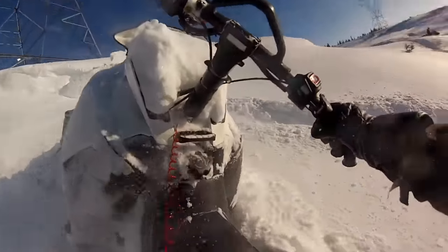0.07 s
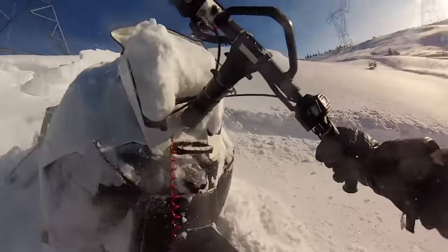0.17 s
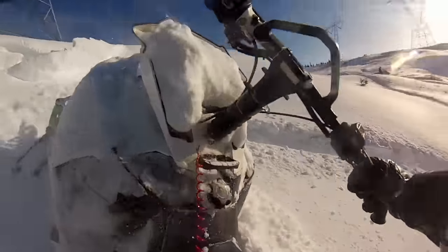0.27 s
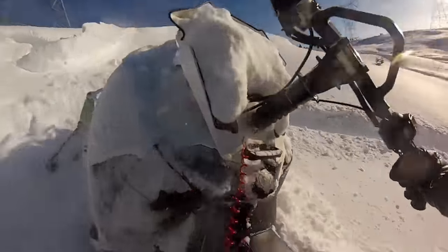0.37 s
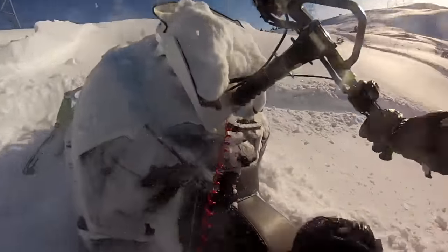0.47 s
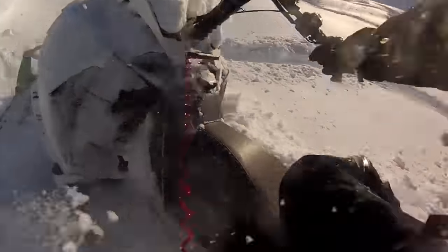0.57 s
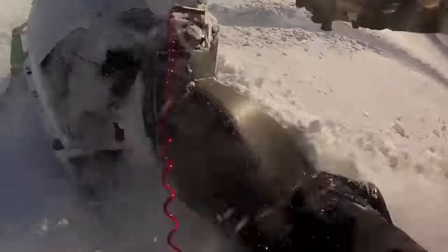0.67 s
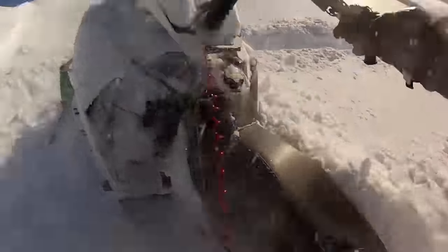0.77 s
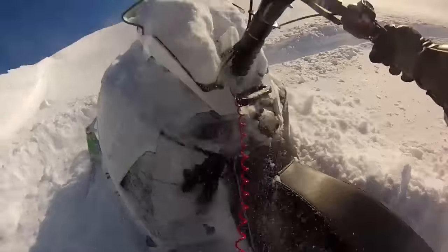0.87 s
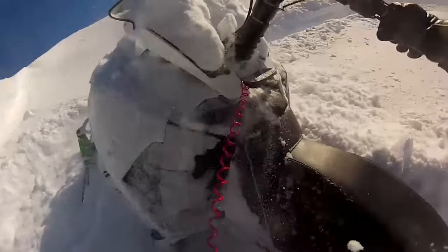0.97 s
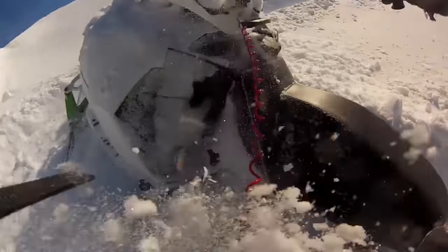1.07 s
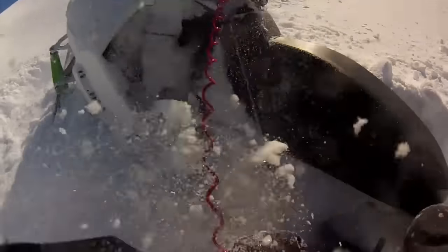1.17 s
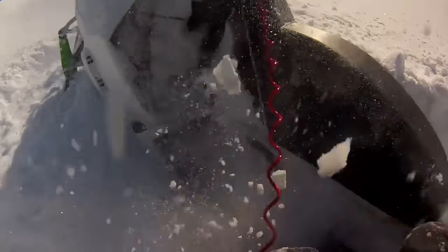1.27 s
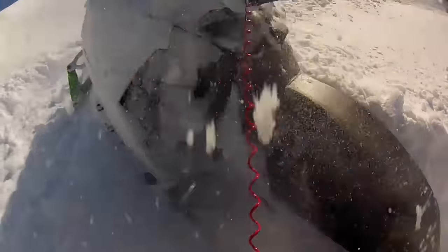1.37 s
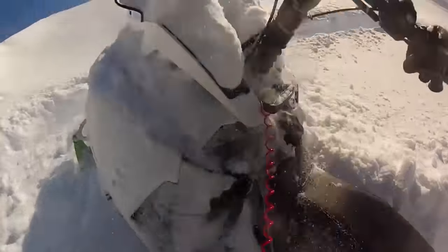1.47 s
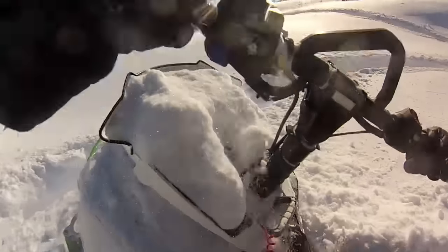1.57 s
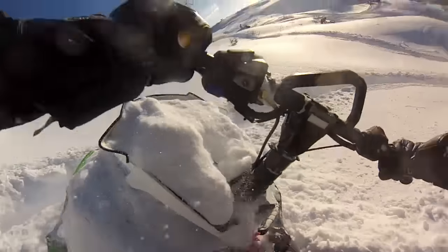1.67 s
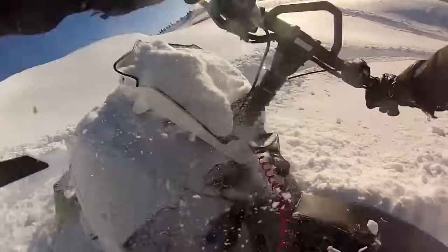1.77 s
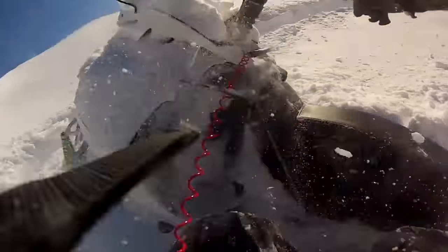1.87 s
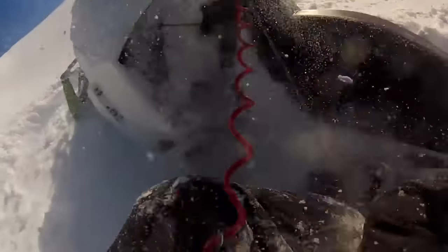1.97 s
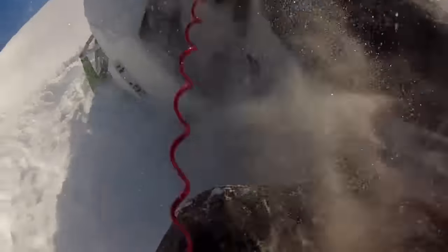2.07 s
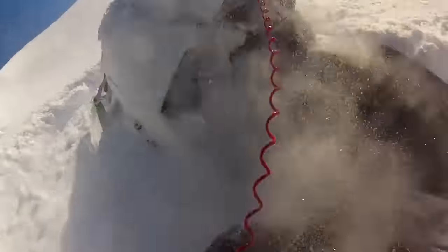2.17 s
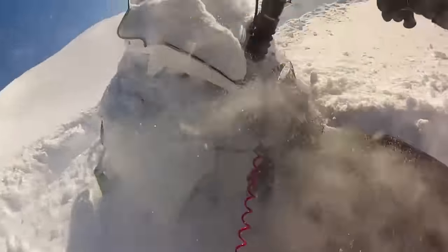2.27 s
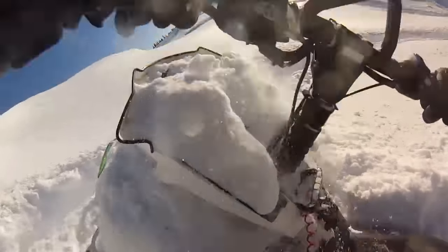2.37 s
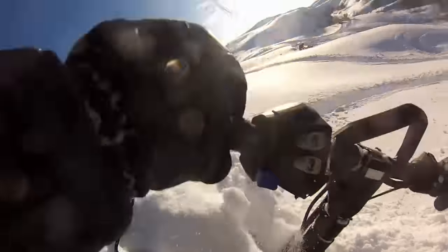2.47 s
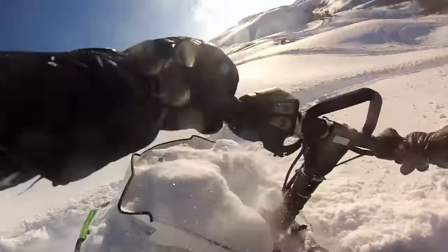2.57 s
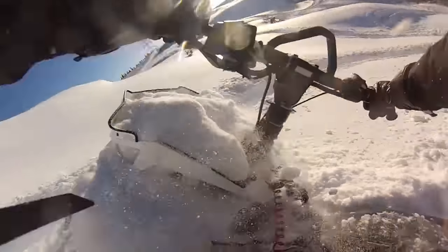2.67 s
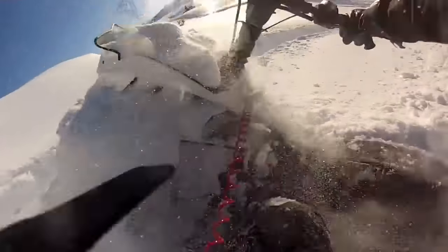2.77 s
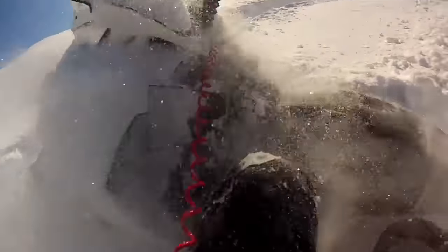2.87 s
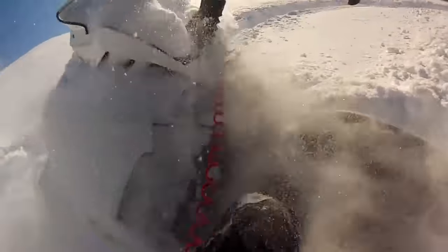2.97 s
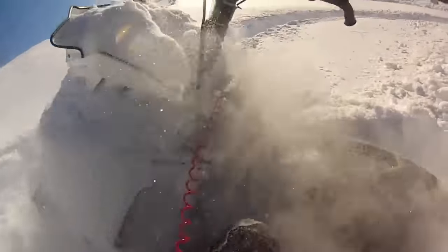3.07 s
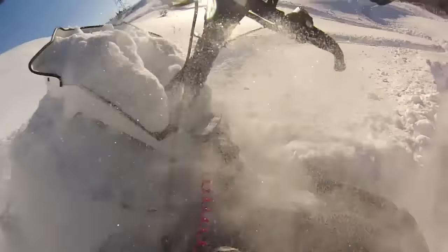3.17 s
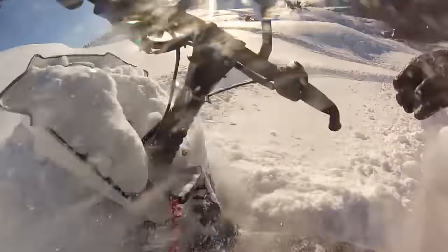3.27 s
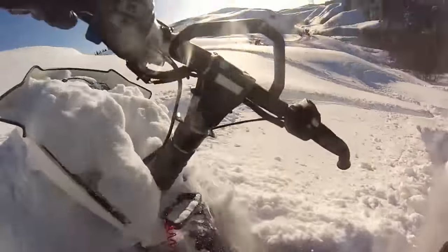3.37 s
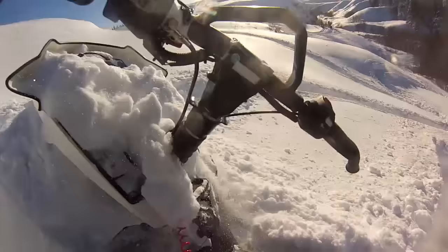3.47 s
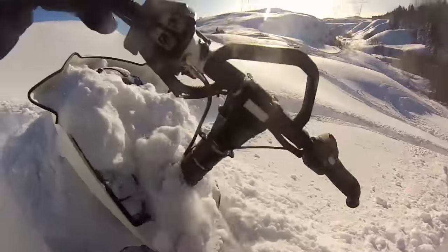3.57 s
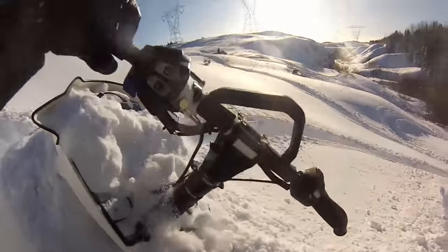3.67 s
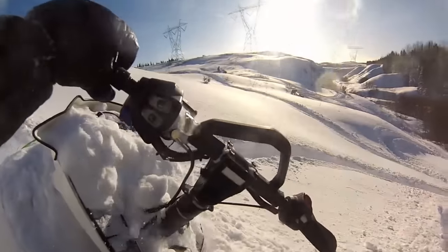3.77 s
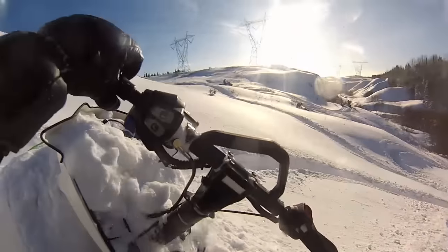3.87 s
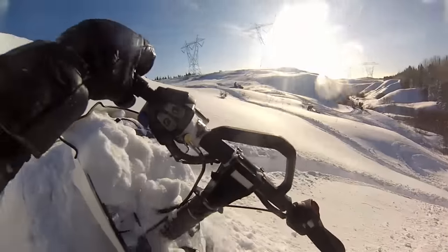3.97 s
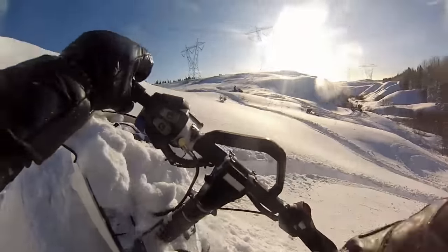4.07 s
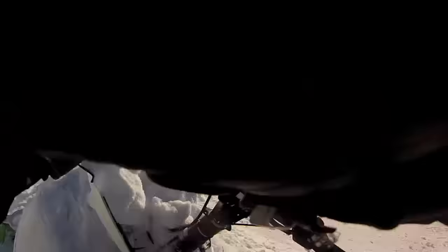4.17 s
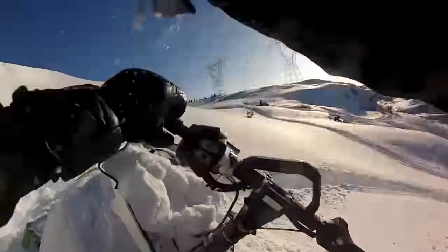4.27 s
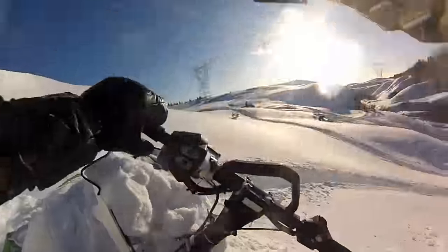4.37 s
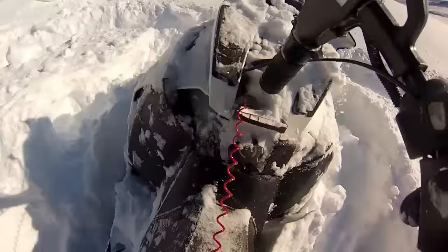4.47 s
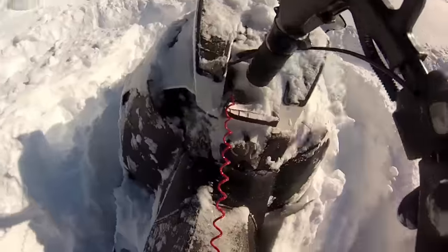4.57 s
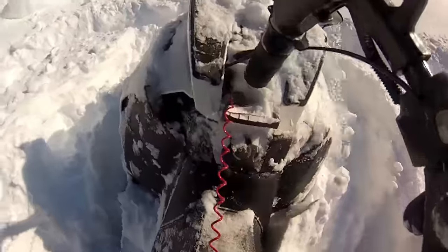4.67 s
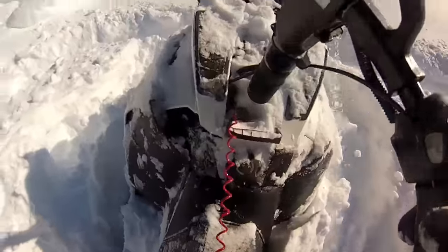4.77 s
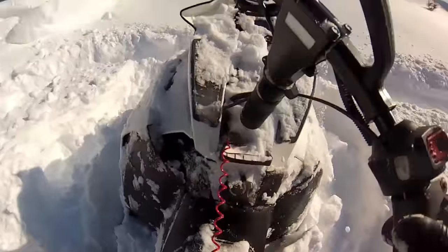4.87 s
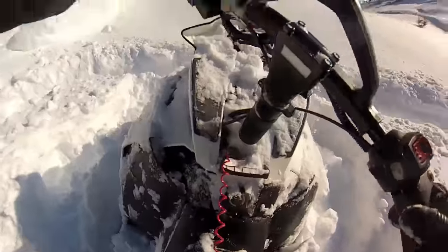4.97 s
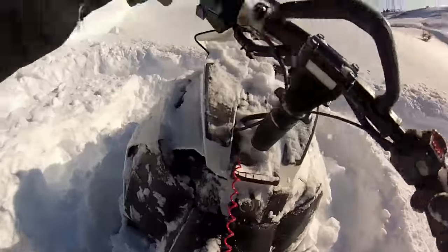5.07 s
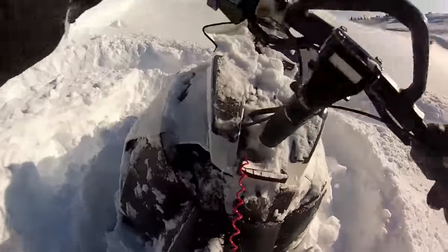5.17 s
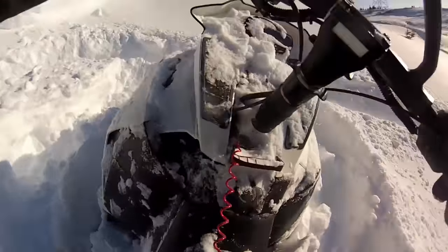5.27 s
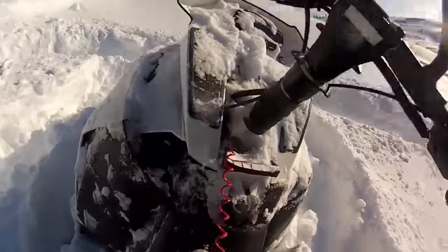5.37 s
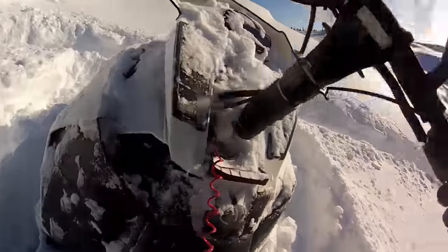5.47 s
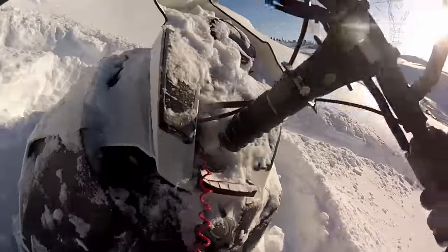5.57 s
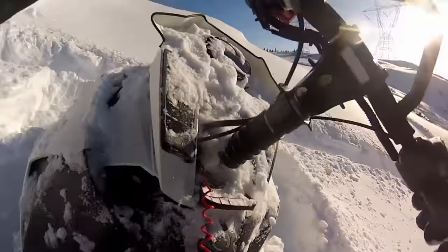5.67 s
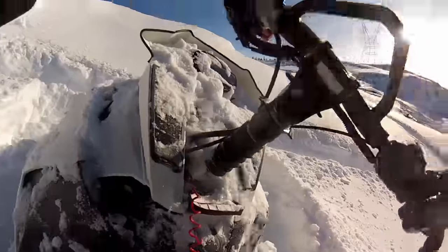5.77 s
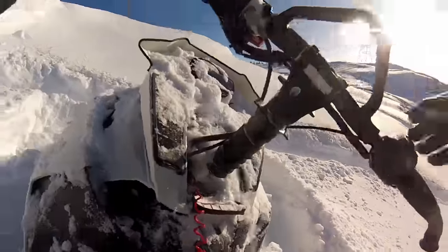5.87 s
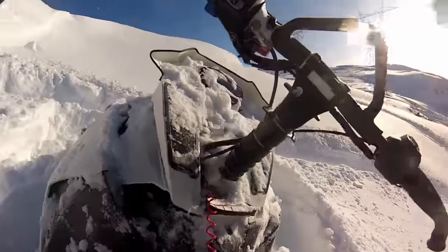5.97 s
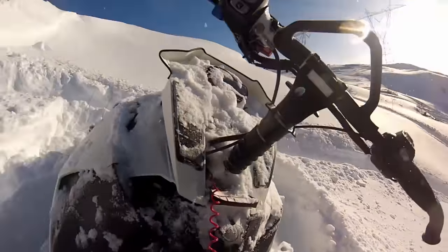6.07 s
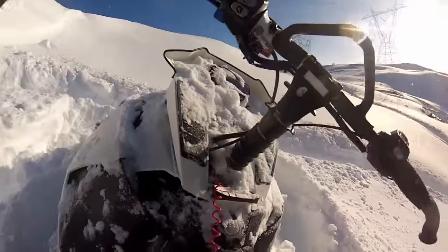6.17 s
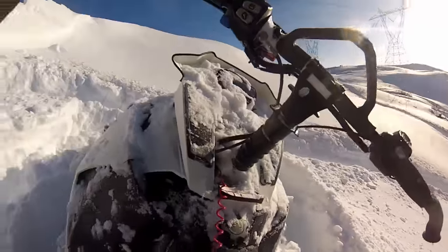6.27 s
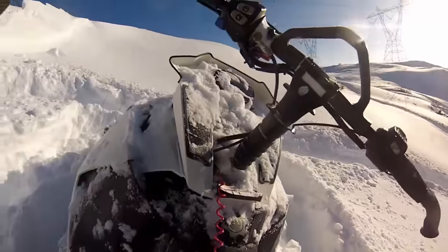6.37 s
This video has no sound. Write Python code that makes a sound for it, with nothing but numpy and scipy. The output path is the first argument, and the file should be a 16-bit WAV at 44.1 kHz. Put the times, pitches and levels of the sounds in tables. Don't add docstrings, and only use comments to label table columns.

```python
import sys
import numpy as np
from scipy import signal
from scipy.io import wavfile

SR = 44100
rng = np.random.default_rng(int(sys.argv[2]) if len(sys.argv) > 2 else 0)


def boost(x):
    u = np.asarray(x, float) / 20
    return 10 ** u


def put_to_file(sound):
    columns = np.atleast_2d(sound).T
    safe = np.clip(columns, -1, 1)
    whole_steps = np.round(safe * 32767)
    wavfile.write(sys.argv[1], SR, whole_steps.astype(np.int16))


N = 284004
T = np.arange(N) / SR
FULL_LOAD_DB = -23
SHUT_S, HEAD_DOWN_S = 2.9, 4.5

# f/Hz, level/dB per Hz
LOADED_COLOUR = [(170, -10.5), (300, -12), (760, -21), (1180, -20), (1400, 0.5), (1830, -3.5), (2500, -12),
                 (3050, -18), (3600, -10), (4600, -23), (5400, -27), (11000, -36.5), (13000, -42.5),
                 (16000, -47)]


def rms_one(x):
    return x / np.sqrt(np.mean(x ** 2) + 1e-20)


def in_time(rows):
    s, *columns = np.transpose(rows)
    return [np.interp(T, s, c) for c in columns]


def at_hz(points, hz):
    table_hz, level_db = np.transpose(points)
    return np.interp(np.log(hz), np.log(table_hz), level_db)


def bumps(rows):
    coarse = T[::64]
    total_db = np.zeros(len(coarse))
    for s, db, width in rows:
        total_db += db * np.exp(-((coarse - s) / width) ** 2)
    return np.interp(T, coarse, total_db)


def drift(rate):
    r = np.exp(-80 * np.pi * rate / SR)
    noise = rng.standard_normal(N // 40 + 2002)
    slow = signal.lfilter([1], [1, -2 * r, r * r], noise)[2000:]
    return np.interp(np.arange(N) / 40, np.arange(len(slow)), rms_one(slow))


def band(x, low_hz, high_hz):
    return signal.sosfilt(signal.butter(2, [low_hz, high_hz], "band", fs=SR, output="sos"), x)


def ring(x, hz, t60):
    r, w = boost(-60 / (t60 * SR)), 2 * np.pi * hz / SR
    return signal.lfilter([0, np.sin(w)], [1, -2 * r * np.cos(w), r * r], x)


def sine(turns):
    return np.sqrt(2) * np.sin(2 * np.pi * (turns + rng.random()))


def crank():
    # t/s, speed/turns per s
    revs = [(0.0, 127.5), (0.28, 127.8), (0.8, 126.8), (1.11, 128.5), (1.26, 126.3), (1.47, 124.5),
            (1.72, 126.8), (1.92, 127.2), (2.18, 124.3), (2.47, 127.1), (2.88, 126.6), (3.0, 121.0),
            (3.1, 102.5), (3.25, 88.3)]
    # t/s, rate/firings per s
    idle_firings = [(4.45, 50.5), (4.8, 46.5), (5.3, 50.8), (6.44, 52.5)]
    return in_time([*revs, *[(s, rate / 2) for s, rate in idle_firings]])[0]


def exhaust(speed, turns, load_db):
    # t/s, level/dB, width/s
    smothered = [(.05, -1, .2), (.95, -2, .12), (1.5, -10.5, 0.087), (1.68, -4.5, 0.076),
                 (2.25, -6.5, 0.12), (2.57, -5.5, 0.075), (2.75, -2.5, .08)]
    order_levels = [-18, -15.5, -21, -25, -42, -26, -26.5, -26, -9.5, -10, -8.5, -12.5, -15, -14, -13, -15,
                    -13.5, -15.5, -20, -21, -18, -22]
    # order, t/s, level/dB, width/s
    sings = [(6, .7, 9, .95), (8, .6, 8, .35), (10, 1.3, 7, .1), (10, 1.8, 15, .15), (11, .2, 3.5, .1),
             (11, 1.13, -14, 0.13), (11, 2.08, -16, 0.14), (12, 1.05, 3, .06), (12, 1.74, 6, 0.11),
             (12, 2.72, 7, 0.073), (13, 0.35, 6, 0.14), (13, 0.96, 8, 0.063), (13, 1.32, 8, .1),
             (13, 2.07, 8, .07), (12, 2.08, 5, .08), (14, 0.29, 12.5, .28), (14, 0.924, 12, 0.094),
             (14, 2.95, 9, .06), (17, 0.32, 7.5, .2), (17, 1.84, 12, .06), (17, 2.35, 11.5, 0.078),
             (17, 2.75, 9, .08), (18, 2.17, 7.5, .1), (19, 2.05, 13, 0.067), (20, 2.45, 9, .07),
             (21, 2.42, 7, .06), (23, 2.35, 10, 0.076), (27, 2.5, 5, 0.32), (28, 2.85, 7, .1)]
    # multiple of crank, level/dB
    idle_orders = [(1, -35.5), (2, -62), (4, -45), (6, -52.5)]
    out = np.zeros(N)
    on = slice(round(3.6 * SR))
    shut = np.maximum(T - SHUT_S, 0)

    firing_db = -22 + 0.3 * (load_db - FULL_LOAD_DB) + bumps(smothered) - 300 * shut ** 2
    out[on] = boost(firing_db[on]) * sine(2 * turns[on])

    upper_db = load_db - 2.3 - 22 * shut
    uneven = (turns + 0.0041 * drift(3.0))[on]
    comb_db = [-25.5] * 8
    for k, order_db in enumerate([*order_levels, *comb_db], start=3):
        sing_db = bumps([row[1:] for row in sings if round(row[0]) == k])
        flutter_db = 1.3 * drift(5.6) + 2.1 * drift(25.0)
        level_db = (upper_db + order_db + sing_db + flutter_db)[on]
        level_db += at_hz(LOADED_COLOUR, k * speed[on]) - at_hz(LOADED_COLOUR, k * 127)
        out[on] += boost(level_db) * sine(k * uneven)

    idle_fade = np.clip((T - 4.3) / 0.17, 0, 1)
    for k, level_db in idle_orders:
        out += idle_fade * boost(level_db + 2.8 * drift(4.1)) * sine(k * turns)
    return out


def firing_gate(turns, idle):
    firing = 2 * turns
    index = firing.astype(int)
    chance_db = (-1.0 + 2.5 * idle) * rng.standard_normal(4000)[index]
    strength = boost(chance_db + 3.3 * (-1) ** index)
    puff = np.sin(np.pi * (firing % 1)) ** 2
    depth = np.clip(0.091 + 0.18 * idle, 0, 1)
    return rms_one(1 - depth + 2 * depth * puff * strength)


def rasp(idle, load_db, turn_db):
    # low/Hz, high/Hz
    zones = [(170, 1200), (1200, 2000), (2000, 4500), (4500, 16000)]
    # level/dB re load, share of load swing, share of head turn
    zone_rules = [(-9, .8, .3), (-4.8, .91, .9), (-6.3, .99, -.9), (-15.5, 1.05, -0.58)]
    # f/Hz, level/dB per Hz
    idling_colour = [(170, -15), (350, -22.5), (700, -12.5), (1030, -8.5), (1230, -12), (1500, 4),
                     (2200, -14.5), (2700, -15.5), (3150, -22.5), (3670, -24), (4500, -31), (5250, -36),
                     (11100, -38.5), (15500, -47)]
    out = np.zeros(N)
    white = rng.standard_normal((2, N))
    shared = drift(7.4)
    count = 0
    for (low, high), (zone_db, follows, turns_with) in zip(zones, zone_rules):
        level_db = FULL_LOAD_DB + zone_db + follows * (load_db - FULL_LOAD_DB) + turns_with * turn_db
        edges = np.geomspace(low, high, int(5 * np.log2(high / low)) + 1)
        centre, width = np.sqrt(edges[1:] * edges[:-1]), np.diff(edges)
        share = np.sqrt(width / len(width))
        loaded = rms_one(boost(at_hz(LOADED_COLOUR, centre)) * share)
        idling = rms_one(boost(at_hz(idling_colour, centre)) * share)
        for k in range(len(centre)):
            gain = (loaded[k] * (1 - idle) + idling[k] * idle) / np.sqrt(len(width))
            patch = boost(level_db + 0.97 * shared + 1.65 * drift(3.06))
            noise = white[count % 2]
            out += gain * patch * rms_one(band(noise, edges[k], edges[k + 1]))
            count += 1
    port = sum(ring(out, hz, 0.0027) for hz in (3500, 7880, 12000, 13400))
    return out + boost(-35.5) * port


def panels(gate, turns):
    # t/s, level/dB, width/s
    seam_buzz = [
        (.6, 32.2, 0.44),
        (1.25, 36, 0.25),
        (2.08, 39.3, 0.24),
        (2.95, 31.8, 0.3),
    ]
    # t/s, level/dB, width/s
    cover_whirr = [
        (2.95, 22, 0.25),
        (3.35, 21, .7),
    ]
    seam_noise = rms_one(ring(gate * rng.standard_normal(N), 5180, 0.0046))
    seam = boost(-72.5 + bumps(seam_buzz)) * seam_noise
    cover_noise = rms_one(ring(gate * rng.standard_normal(N), 3730, 0.005))
    cover = boost(-70 + bumps(cover_whirr)) * cover_noise

    firing = 2 * turns
    strength = boost(1.3 * rng.standard_normal(4000)[firing.astype(int)])
    bang = np.exp(-(firing % 1) / 0.3) * strength
    shake = (bang + 0.27) * rng.standard_normal(N)
    shake += 16 * strength * (np.diff(firing // 1, prepend=0) > 0)
    swell = ring(ring(shake, 1422, 0.014), 1506, 0.032)
    rings = rms_one(swell)
    rings += boost(-15.5) * rms_one(ring(shake, 3600, 0.0098))
    rings += boost(-27) * rms_one(ring(shake, 2460, 0.012))
    rise = np.clip((T - HEAD_DOWN_S) / 0.04, 0, 1)
    return seam + cover + boost(-42.5 + bumps([(4.56, 4.0, 0.06)])) * rise * rings


def track():
    # t/s, rate/lugs per s
    lugs = [(0, 105), (.98, 118), (1.12, 135), (1.55, 127), (2.02, 147), (2.32, 135), (2.8, 156),
            (2.95, 153), (3.1, 140)]
    # multiple of lug rate, level/dB
    lug_orders = [(1, -2), (2, -2), (3, -5)]
    # t/s, level/dB, width/s
    bites = [
        (.55, 29, 0.51),
        (1.3, 27, 0.19),
        (2.05, 23, 0.36),
        (2.75, 20, 0.39),
    ]
    turns = np.cumsum(in_time(lugs)[0]) / SR
    stop_db = 60 * np.maximum(T - SHUT_S, 0)
    tones = sum(boost(db + 1.8 * drift(1.87)) * sine(k * turns) for k, db in lug_orders)
    return boost(-59.5 + bumps(bites) - stop_db) * tones


def clods():
    # t/s, peak/dB, f/Hz, shell ring/dB above the thud, t60/s
    thuds = [(.445, -18, 540, -12, .014), (.49, -13, 577, -16, 0.018), (.592, -16.5, 566, -10, .015),
             (.913, -20.5, 686, -12, 0.022), (.99, -28, 700, -5, .013), (1.115, -22.5, 460, -17, 0.013),
             (1.301, -26, 420, -6, .014), (1.944, -10.5, 540, -28, 0.017), (1.957, -12, 420, -2, 0.018),
             (1.9693, -17, 940, 5.5, 0.011), (2.0053, -18.5, 974, 6.5, 0.025), (2.111, -16, 418, -4, 0.015),
             (3.387, -19.5, 564, -1, 0.0082), (3.728, -34.5, 700, 10, .01), (4.12, -31.5, 422, -6, .014),
             (4.28, -36, 900, -5, 0.0091), (6.328, -29, 317, -9.5, 0.018), (6.429, -41.5, 500, -1, .014)]
    # t/s, peak/dB, f/Hz, t60/s
    thumps = [(0.645, -38.5, 218, 0.064), (1.112, -7.5, 215, 0.079), (1.789, -21, 72.7, 0.05),
              (1.943, -10, 88.8, 0.055), (1.953, -14, 185, .07), (2.623, -14, 103, 0.055),
              (2.747, -14, 108, 0.057), (3.404, -15, 148, 0.035), (5.404, -20.5, 101.7, 0.079),
              (6.057, -20, 102, 0.061)]
    # t/s, peak/dB, f/Hz
    ticks = [(1.9459, 7.5, 3700), (1.944, -20, 11000), (1.959, -5, 3700), (1.959, -16, 8000),
             (1.978, -24, 5000), (3.08, -41, 13500), (3.1293, -24, 12000), (3.312, -38, 12500),
             (3.32, -36, 11500), (3.329, -37, 12000), (3.338, -39, 11000), (3.7284, -40, 4000),
             (4.1091, -46, 5000), (4.6329, -48.5, 6500), (4.6982, -41, 7000), (5.4106, -42, 6000),
             (6.3275, -42, 7000), (6.3535, -40, 6900)]
    out = np.zeros(N)
    soft = np.pad(np.hanning(12) / 6, (0, 3988))
    for s, peak_db, hz, shell_db, t60 in thuds:
        i = round(s * SR)
        thud = ring(soft, hz, t60) + boost(shell_db) * ring(soft, 1560, 0.013)
        out[i:i + 4000] += boost(peak_db + 5.0) * thud[:N - i]
    for s, peak_db, hz, t60 in thumps:
        i = round(s * SR)
        out[i:i + 4000] -= boost(peak_db) * ring(soft, hz, t60)
    for s, peak_db, hz in ticks:
        i = round(s * SR)
        crack = rng.standard_normal(400) * np.exp(-np.arange(400) / SR / 0.0018)
        crack[0] -= 4
        out[i:i + 400] += boost(peak_db) / 2 * band(crack, 0.8 * hz, min(1.25 * hz, 15500))
    return out


def glove():
    # t/s, height, rise/s, fall/s
    pushes = [
        (1.9465, -.45, .0015, .002),
        (4.1985, -2.6, .0013, .0019),
        (4.213, .5, .003, .003),
    ]
    # t/s, length/s, level/dB
    scuffs = [
        (4.195, 0.004, -27),
        (4.1999, .0025, -6),
        (4.2015, 0.0063, -24),
        (4.208, 0.012, -19),
        (4.215, 0.003, -29),
    ]
    push, scuff = np.zeros(N), np.zeros(N)
    for s, height, rise, fall in pushes:
        before = np.exp(-((T - s) / rise) ** 2)
        after = np.exp(-np.abs(T - s) / fall)
        push += height * np.where(T < s, before, after)
    for s, length, level_db in scuffs:
        touching = (T > s) * (T < s + length)
        scuff += boost(level_db) * touching * np.exp(-np.abs(T - s) / (0.65 * length))
    swing = np.zeros(N)
    swing[round(4.2 * SR)] = 0.26
    noise = rng.standard_normal(N)
    shell = band(noise, 1100, 11200) + 1.4 * band(noise, 3100, 4500)
    lid = boost(-61) * ring(noise * (np.abs(T - 4.226) < 0.008) + 1e-18, 2090, 0.031)
    return push + ring(swing + 1e-18, 15.6, 0.4) + scuff * shell + lid


def rumble(load_db):
    # t/s, level/dB, width/s
    jolts = [(.13, 10, .06), (.4, 5.5, .07), (.62, 4, .04), (.75, -10, .07), (.96, 10, 0.055),
             (1.23, 12.5, .05), (1.58, 7, 0.095), (1.71, -5, .04), (1.8, 9.5, 0.025), (1.98, 10.5, 0.048),
             (2.23, 14, 0.053), (2.7, 1.5, .1), (2.91, 6.5, .05), (3.17, -4.5, 0.14), (3.38, 2.5, 0.04),
             (3.88, -4, .12), (4.43, -13.5, .1), (4.68, 8, 0.043), (5.0, 5.5, 0.04), (5.18, -20, .08),
             (6.09, 5, 0.033), (6.35, -2, .08)]
    # t/s, level/dB, width/s
    drumming = [(.02, 5, .05), (.65, -3.5, .12), (1.3, 2, .15), (1.95, 8.5, 0.044), (2.7, -2, .12),
                (3.15, -6, .1), (3.85, -4, .15), (4.95, -3, .2), (5.95, 4, .1)]
    shake_db = 0.2 * (load_db - FULL_LOAD_DB)
    jolt_db = bumps(jolts)
    deep_db = -24.5 + shake_db + jolt_db
    drum_db = -31.5 + shake_db + 0.27 * jolt_db + bumps(drumming) + 2.0 * drift(3.6)
    deep = rms_one(band(rng.standard_normal(N), 14.7, 40.4))
    drum = rms_one(band(rng.standard_normal(N), 55, 149.6) * boost(3.5 * drift(33.0)))
    return boost(deep_db) * deep + boost(drum_db - 1.5) * drum


def scene():
    # t/s, level/dB, turn/dB
    load = [(0, -26, 0), (.4, -24.5, 0), (.7, -25, .5), (.95, -25, 0), (1.22, -23, 2.5), (1.42, -25.5, -.5),
            (1.55, -23.5, -0.5), (1.75, -26.5, -1), (2.05, -23.5, 0), (2.3, -25, -2), (2.58, -27.5, 0),
            (2.8, -24, 0), (2.97, -25.5, 0.5), (3.24, -33.5, 2), (4.0, -45, 0.5)]
    # t/s, level/dB, turn/dB
    load_idling = [
        (4.5, -45, 0.5),
        (4.62, -51, 0),
        (6.44, -51.5, 0),
    ]
    # t/s, level/dB
    duck = [
        (4.215, -0.5),
        (4.225, -25),
        (4.27, -10),
        (4.33, -7.5),
        (4.35, 2.5),
        (4.45, 1),
    ]
    speed = crank()
    turns = np.cumsum(speed) / SR
    load_db, turn_db = in_time([*load, *load_idling])
    gate = firing_gate(turns, idle=np.clip((T - 3.4) / 1.5, 0, 1))
    head_down = np.clip((T - HEAD_DOWN_S) / 0.068, 0, 1)
    engine = exhaust(speed, turns, load_db)
    engine += gate * rasp(head_down, load_db, turn_db)
    engine += panels(gate, turns)
    ducked = boost(in_time(duck)[0]) * (engine + track() + clods() + rumble(load_db))
    return (ducked + glove())[None]


def band_limit(x):
    return signal.sosfilt(signal.butter(12, 16420, fs=SR, output="sos"), x)


def record(dry):
    top_cut = signal.cheby2(14, 60, 15600, fs=SR, output="sos")
    last_cut = signal.cheby2(10, 50, 16500, fs=SR, output="sos")
    clipped = np.clip(signal.sosfilt(top_cut, dry), -1, 1)
    return band_limit(signal.sosfilt(last_cut, clipped))


dry = scene()
out = record(dry)
put_to_file(out)
```